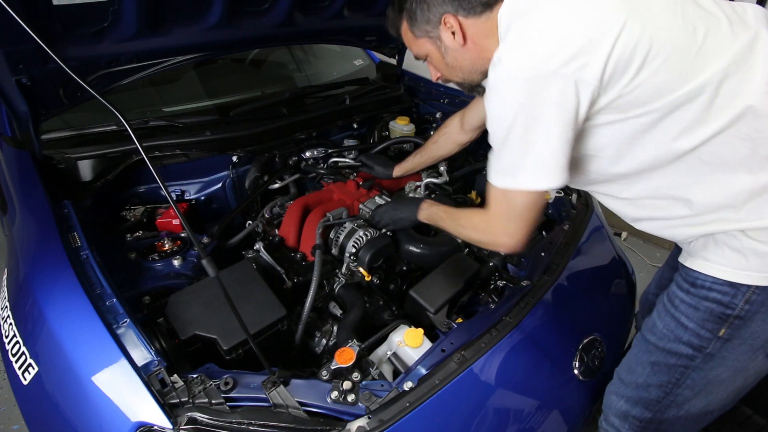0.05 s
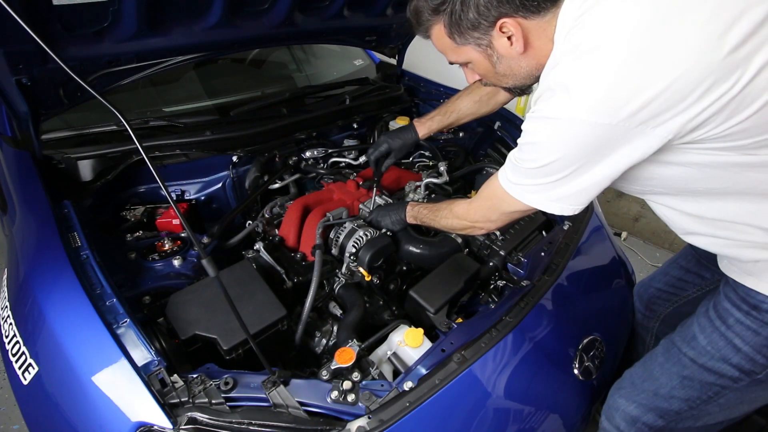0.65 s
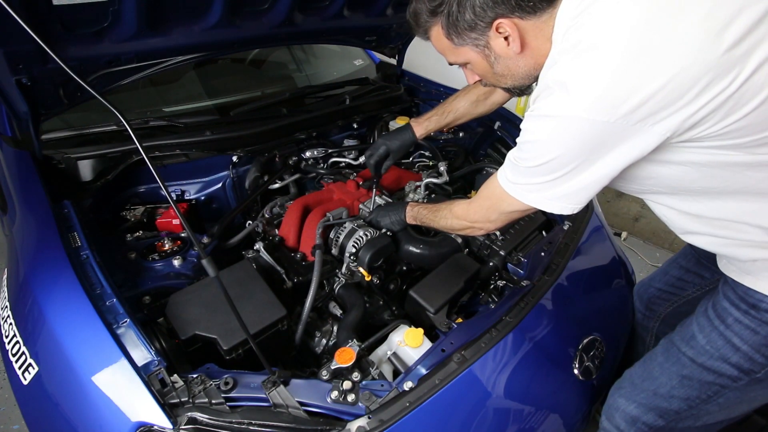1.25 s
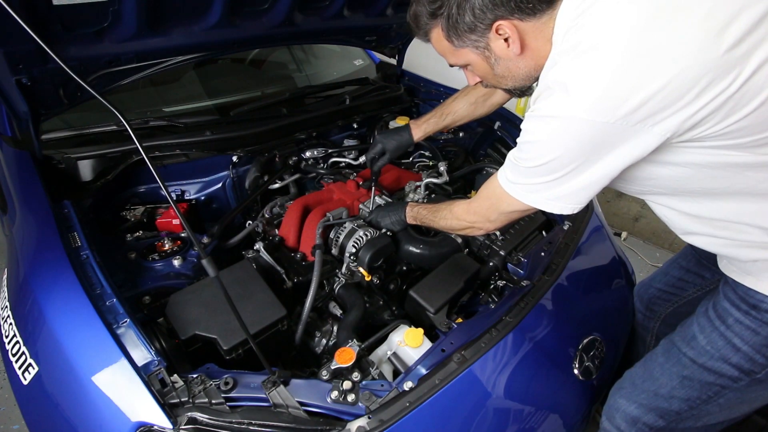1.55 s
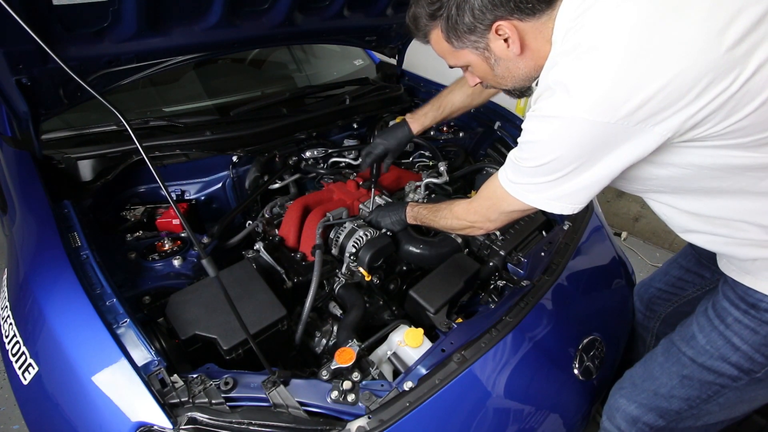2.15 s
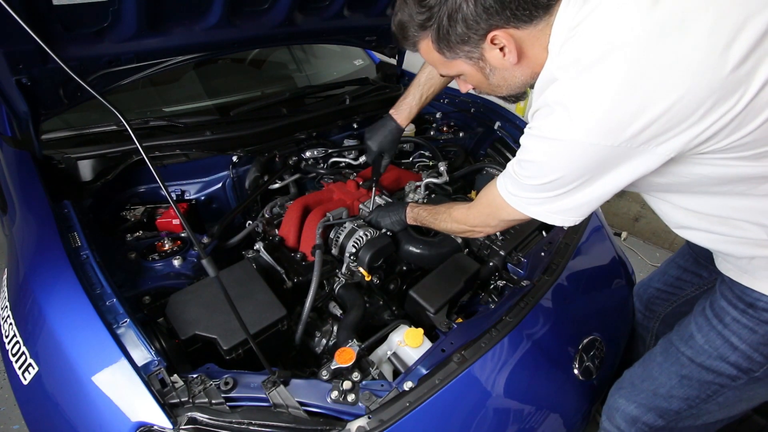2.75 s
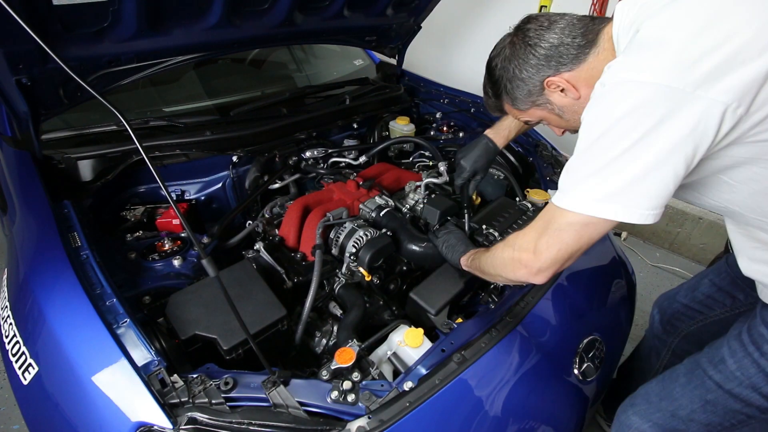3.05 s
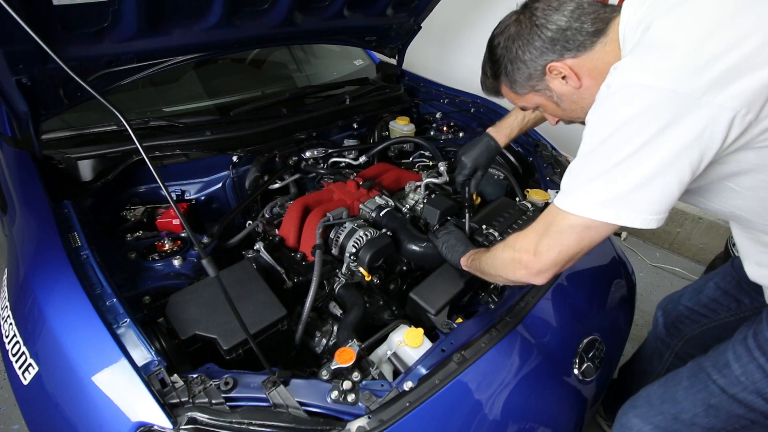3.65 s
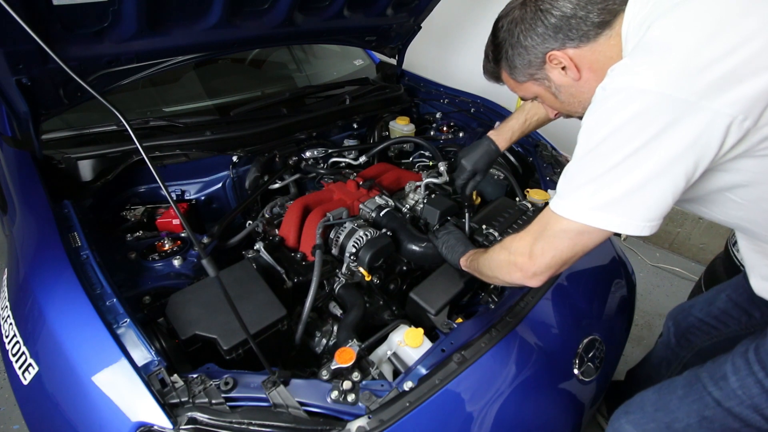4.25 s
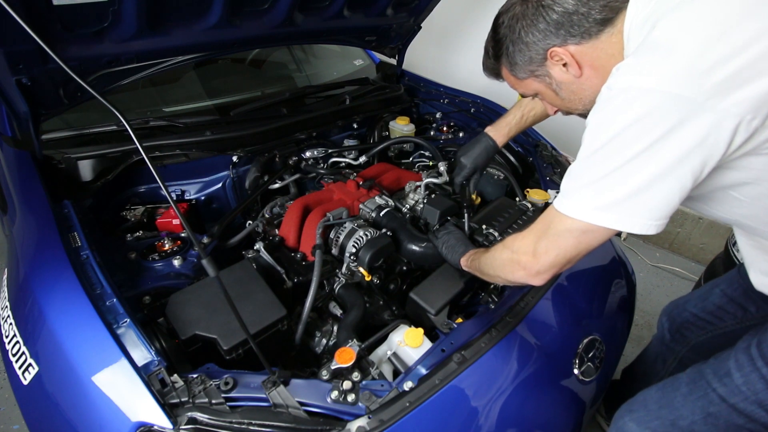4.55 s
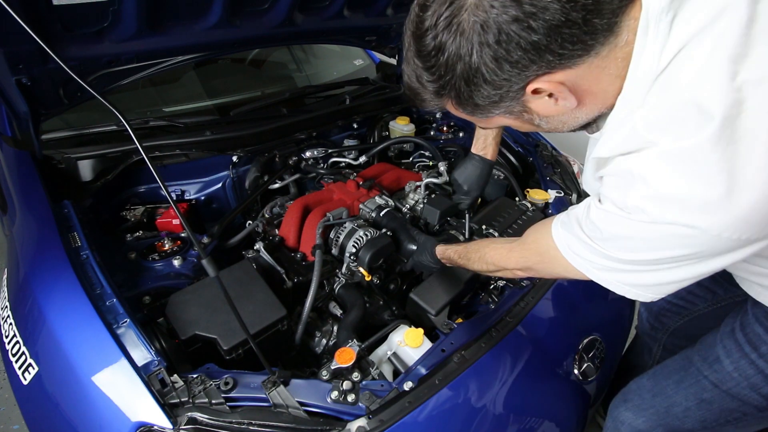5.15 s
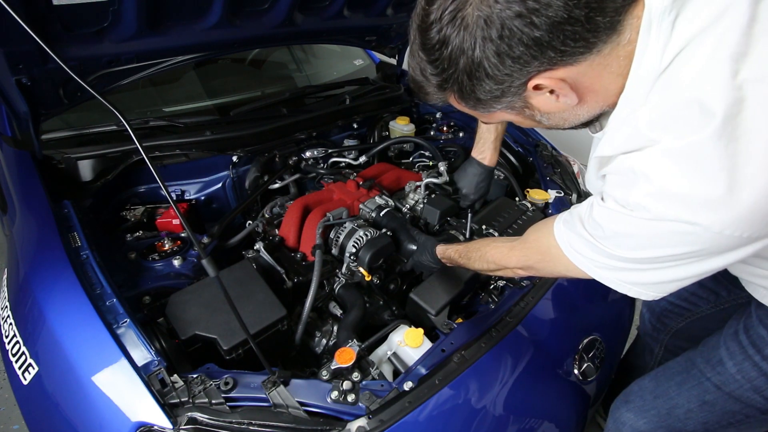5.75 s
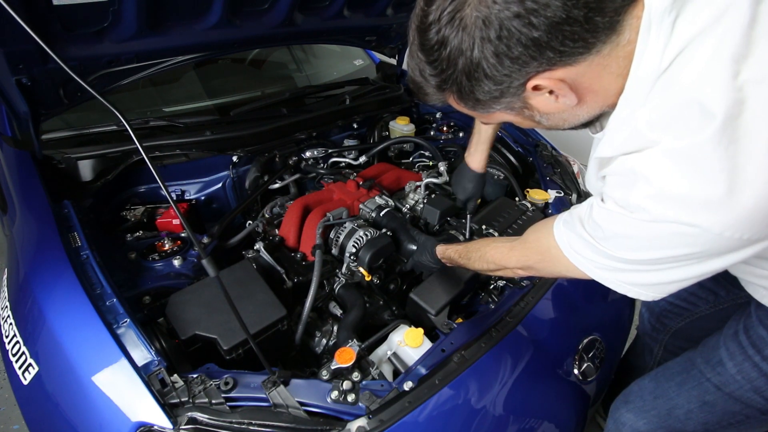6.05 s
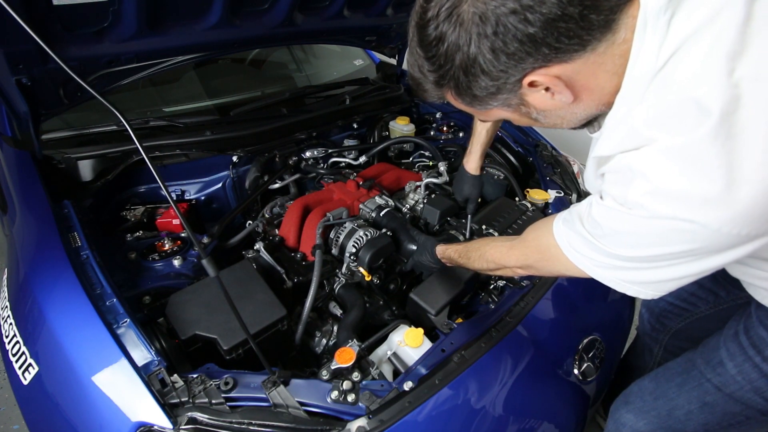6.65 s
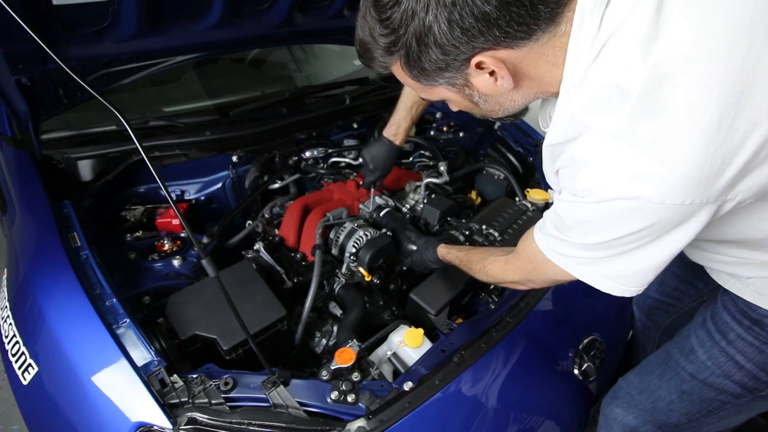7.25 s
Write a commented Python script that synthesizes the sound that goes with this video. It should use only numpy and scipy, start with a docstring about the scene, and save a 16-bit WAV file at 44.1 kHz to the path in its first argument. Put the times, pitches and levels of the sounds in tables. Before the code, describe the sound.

Rubber chafing, light metal clicks and glove rustle in a quiet garage, ending in five hollow plastic knocks, with soft electrical ticking throughout.

```python
"""First come a soft, steady ticking and a faint rustle of gloves in a quiet garage. The ticking is a
wireless beacon leaking into the microphone's amplifier. Hands work a rubber hose into an engine bay:
it chafes as it catches and slips, and its metal clamps click against their fittings. Near the end,
plastic parts snap into place with loud knocks that ring in a hollow duct and around the room."""
import sys
import numpy as np
from scipy import signal
from scipy.fft import rfft, irfft, next_fast_len
from scipy.io import wavfile
from scipy.ndimage import map_coordinates

SR = 44100
rng = np.random.default_rng(int(sys.argv[2]) if len(sys.argv) > 2 else 0)


def wav_record(signal):
    """Record a signal, one row per channel, as 16-bit PCM in the file named by sys.argv[1]."""
    frames = np.transpose(np.atleast_2d(signal))
    bounded = np.clip(frames, -1, 1)
    # unit amplitude maps onto the largest positive 16-bit level
    quanta = np.round(bounded * 32767).astype(np.int16)
    wavfile.write(sys.argv[1], SR, quanta)


N = 330750  # 7.5 seconds

# how long the garage's echo takes to fade by 60 dB: (frequency [Hz], fade time [s])
ECHO_FADE = [(100, 0.02), (450, 0.39), (1200, 0.73), (3500, 0.57), (6000, .5), (12000, 0.58)]
# how strong the echo starts, from bass to treble: (frequency [Hz], level [dB])
ECHO_COLOUR = [(100, 21), (450, 10.5), (1200, 3), (3500, 0), (6500, -1), (12000, -4.5)]
# the colour of each sound, meaning its mix of low and high: (frequency [Hz], level [dB])
ROOM_COLOUR = [(12, -42), (20, -2.5), (77, 0), (328, -15), (472, -2), (624, -12), (949, -10), (1120, -19.5),
               (1860, -21), (3250, -18), (4060, -19.5), (14300, -21.5), (16000, -25.5)]
HISS_COLOUR = [(12, -32), (20, -6.5), (485, -17), (698, -17), (849, -17), (976, -27), (3630, -26),
               (4420, -17.5), (13900, -15), (16000, -16.5)]
SHOE_COLOUR = [(80, -4), (150, -10), (240, 3.5), (400, -5), (650, -5), (880, -4.5), (1150, -11),
               (1600, -20), (4000, -50)]
GLOVE_COLOUR = [(710, -28), (1200, 2), (1630, -7), (2180, 1.5), (2350, -5), (2920, 0), (5180, -4.5),
                (6580, -9), (15000, -21), (16000, -35)]
SLEEVE_COLOUR = [(150, -22), (250, -3), (468, -1.5), (701, -2), (1150, -3), (1730, -11), (2500, -9.5),
                 (3250, -35), (5500, -120)]
FENDER_COLOUR = [(30, -29), (60, -6), (85, -3.5), (108, -3), (160, -4.5), (220, -6.5), (400, -15),
                 (800, -60)]
HOSE_COLOUR = [(120, -29), (230, -8), (380, -5), (700, -5.5), (1100, -3), (1620, -5.5), (2300, -6),
               (3200, -5.5), (4200, -7.5), (5300, -7), (6200, -10), (8400, -13), (10700, -12.5),
               (16000, -23)]
CLAMP_COLOUR = [(90, -43), (180, -10), (320, -13), (460, -3), (700, -4), (1050, -1), (1480, -4), (2300, -5),
                (3200, -2), (4100, -5.5), (4800, 0), (8400, -15), (10800, -11), (16000, -27)]
PLASTIC_COLOUR = [(40, -48), (80, -15), (160, -10.5), (250, -14.5), (340, -5.5), (430, 1), (680, -5),
                  (1050, -1.5), (1400, -5), (2100, -8.5), (3200, -8), (4400, -13.5), (5600, -10.5),
                  (10500, -26.5), (16000, -34)]
# the pitches that each part makes louder: (frequency [Hz], width [Hz], level [dB])
FITTING_PEAKS = [(474, 65, 1), (1120, 300, 1), (2890, 360, 4), (3550, 180, 4), (4640, 230, -11),
                 (5110, 650, 3), (10800, 990, -5)]
CLAMP_PEAKS = [(464, 130, -0.5), (2160, 50, -21), (2980, 390, 1.5), (3670, 130, 3), (4640, 140, -8),
               (4930, 220, -22), (5170, 260, 1), (7340, 290, 1), (9420, 200, 0), (11000, 250, 0)]
PLASTIC_PEAKS = [(293, 25, 0.5), (370, 42, 1.5), (499, 37, -0.5), (621, 82, 2.5), (759, 13, 2.5),
                 (819, 13, 4.5), (1030, 61, -7), (1084, 100, 0.5), (1110, 29, -11), (1227, 24, -5.5),
                 (2430, 130, -13.5), (3050, 300, -11), (3490, 140, -1.5)]
# the notes a struck duct or fender rings with: (frequency [Hz], level [dB], time to fade 60 dB [s])
DUCT_NOTES = [(390.3, 1, 0.29), (482, 3.5, 0.71), (500, -1.5, 1), (550, -4.5, 0.73), (610, -2, 0.89),
              (677, -6, 0.34), (775, -12, 0.25), (1070, -40, 0.3), (1240, 1, 0.26), (1307, -7, 1),
              (3660, -12, 0.32)]
FENDER_NOTES = [(118.4, -1.5, 0.3), (156, -5.5, 0.5), (177.6, -7.5, 0.48), (253, -12, 0.33), (286, 6, 0.43),
                (318, -2, 0.92), (345, -7.5, 0.19), (387, 5, 0.14)]
# tone on the engine (first row) and at the hollow air box (second): (low [dB], middle [dB], treble [dB])
HOSE_TONE = [(0.5, -1.5, -1.5), (10.5, 7, 0.5)]
CLAMP_TONE = [(-1, 0.5, 3.5), (10, 6.5, 6)]

# runs of beacon ticks: (start [s], end [s])
TICK_RUNS = [(.0604, .3), (.3445, 2.95), (3.0236, 5.), (5.1001, 7.5)]
# how hard the gloves work: (time [s], level [dB])
GLOVE_EFFORT = [(0.0, -58.5), (0.38, -53), (0.6, -51), (1.23, -49), (1.54, -54.5), (1.94, -49), (2.21, -48),
                (2.61, -53.5), (2.84, -56), (3.34, -50.5), (3.8, -53.5), (5.35, -58), (6.14, -64.5),
                (6.29, -59), (6.47, -75), (6.77, -61), (6.92, -52.5), (7.5, -60.5)]
# a sleeve swishes as an arm swings: (middle time [s], level [dB])
ARM_SWINGS = [(3.46, -49), (4.55, -52), (4.92, -45.5), (5.3, -46), (5.77, -36.5), (6.35, -42.5),
              (6.97, -42), (7.43, -50.5)]
# the body leans on the fender: (start [s], end [s], level [dB])
FENDER_LEANS = [(0, 0.203, -54), (3.05, 5.3, -54.5), (6.15, 6.35, -56), (6.786, 7., -54)]
# hard blows reach the fender's sheet metal: (time [s], level [dB])
FENDER_THUMPS = [(2.977, -45), (4.745, -31), (5.097, -28), (6.78, -29)]
# the twisted hose slips: (middle time [s], level [dB], treble [dB], half length [s])
HOSE_SLIPS = [(.11, -51, 14.5, 0.0078), (.412, -45.5, -3, .007), (.484, -39, 1, 0.0031),
              (.55, -42, -6, 0.0082), (.651, -37, 1, .009), (.698, -30, 3, 0.0043), (.847, -33.5, 3, 0.011),
              (.907, -35.5, 3.5, 0.0052), (1.063, -39, 0, 0.0055), (1.114, -34, 2, .008),
              (1.18, -41, -4, .005), (1.27, -36, 4, .005), (1.339, -35, -1.5, 0.0069),
              (1.467, -40.5, -4, 0.0046), (1.481, -36, 7, 0.0029), (1.542, -32, 4.5, 0.0079),
              (1.611, -40.5, 2, 0.0045), (1.731, -37.5, -0.5, .008), (1.779, -34.5, 3.5, 0.0046),
              (2.094, -37.5, -4, 0.0095), (2.205, -31.5, 0.5, 0.0072), (2.395, -42, -13, 0.0053),
              (2.53, -40.5, -4, .009), (2.863, -51.5, 1, 0.018), (2.996, -39, -2, .006),
              (3.169, -41, 6, 0.0081), (3.353, -43.5, 10, 0.0054), (3.484, -47, 5, .02),
              (3.553, -45.5, 6.5, 0.0062), (3.791, -46, 2, .01), (3.891, -39.5, -9, 0.0038),
              (4.09, -43.5, -2.5, .006), (4.191, -37, -4, 0.0093), (4.413, -36, -1.5, 0.0055),
              (4.498, -38.5, 1, 0.0053), (4.785, -34, 3.5, 0.0029), (5.116, -38, 6, .003),
              (5.184, -42, 4, .008), (5.608, -38, -7, 0.0061), (6.295, -35.5, -15, 0.01),
              (6.925, -36.5, -7, 0.0074), (7.264, -36.5, -2, 0.0088), (7.345, -35.5, -9, 0.016)]
# a clamp clicks: (time [s], level [dB], treble [dB], ring pitch [Hz])
CLAMP_CLICKS = [(.425, -36, 4.5, 3140), (0.491, -31.5, 4.5, 2900), (.897, -33.5, 0.5, 2880),
                (1.0186, -36, -13, 3080), (1.2273, -29, -8.5, 3280), (1.3231, -33.5, 0.5, 3800),
                (1.487, -31, 3, 4900), (1.68, -33.5, -14, 3230), (1.7918, -29.5, -9, 3500),
                (1.9271, -19, 1.5, 4880), (1.954, -31, -0.5, 2100), (2.0291, -27.5, -3, 2130),
                (2.3109, -31, -7, 3680), (2.976, -28.5, -5.5, 5600), (3.008, -35, -4.5, 3630),
                (3.0861, -39.5, -8, 5850), (3.247, -43, 0.5, 4800), (3.8767, -40, -1, 5050),
                (4.068, -40, -12, 2750), (4.171, -41, -5, 4670), (4.396, -39, -3.5, 5200),
                (4.7438, -38.5, -34, 2340), (4.766, -38, -1, 4800), (4.773, -38, 2, 5190),
                (4.8147, -41.5, -1, 4800), (4.883, -33.5, -10.5, 2980), (5.2902, -37, -12, 2700)]
# a plastic part snaps into place: (time [s], level [dB], depth [dB], treble [dB], ring pitch [Hz],
# duct level [dB], bounce delay [s], settling delay [s]); depth lifts the low and middle pitches
PLASTIC_KNOCKS = [(5.096, -18, 1, -7, 2460, -28, 0.024, 0.16),
                  (5.622, -25, -2.5, 2.5, 3500, -37, 0.0056, 0.16),
                  (6.1304, -21.5, 0, 5.5, 3220, -35, .03, .19), (6.7789, -18.5, 1, 3, 3380, -26, .03, .165),
                  (7.1896, -22.5, -4, -1, 3500, -21, 0.026, 0.19)]
# added to a knock for its snap, its bounce and its settling: (level [dB], depth [dB], treble [dB])
KNOCK_STAGES = [(0, 0, -2.5), (-9, -2.5, -7), (-12.5, 1, -1)]

MOVE_S = (2.18, 2.61)  # the hands leave the engine, then arrive at the air box


def amp(db):
    """Turn decibels into a number to multiply by."""
    return 10 ** (np.asarray(db) / 20)


def unit(x):
    """Scale a signal so its average strength (rms) is 1."""
    return x / np.sqrt(np.mean(x ** 2) + 1e-20)


def along(points, hz):
    """Read between the rows of a (frequency, value) table, spacing pitches by octaves."""
    freqs, values = np.transpose(points)
    return np.interp(np.log(hz + 1), np.log(freqs + 1), values)


def wobble(rate):
    """A smooth curve through `rate` random values a second."""
    return map_coordinates(rng.standard_normal(int(N * rate / SR) + 4), [np.arange(N) * rate / SR])


def filtered(x, gain):
    """Turn each frequency up or down by gain(hz)."""
    size = next_fast_len(N + SR // 2)
    return irfft(rfft(x, size) * gain(np.fft.rfftfreq(size, 1 / SR)), size)[..., :N]


def noise(colour):
    """Steady noise of strength 1 in the given colour."""
    return unit(filtered(rng.standard_normal(N), lambda hz: amp(along(colour, hz))))


def add(track, s, sound):
    """Mix a sound into the track, starting at s seconds."""
    start = max(round(s * SR), 0)
    track[start:start + len(sound)] += sound[:max(N - start, 0)]


def garage_echo():
    """The walls return a wash of sound whose lows and highs fade at their own speeds."""
    hz, t, spectrum = signal.stft(rng.standard_normal(SR), SR, nperseg=256)
    fade_db = along(ECHO_COLOUR, hz)[:, None] - 60 * t / along(ECHO_FADE, hz)[:, None]
    echo = signal.istft(spectrum * amp(fade_db), SR, nperseg=256)[1]
    echo *= 1 - np.exp(-np.arange(len(echo)) / SR / 0.0023)  # quick fade-in
    return echo / np.linalg.norm(echo)


def beacon_ticks():
    """Each radio burst nudges the amplifier's voltage; a capacitor lets that step sag, leaving a tick."""
    period_s, burst_s, sag_hz = .1024, .0017, 140
    t, bursts = np.arange(N) / SR, np.zeros(N)
    for start, end in TICK_RUNS:
        bursts += (t >= start) & (t < end) & ((t - start) % period_s < burst_s)
    return -amp(-34) * signal.lfilter(*signal.butter(1, sag_hz, "high", fs=SR), bursts)


def shoe_scuff():
    """A shoe slides briefly on the floor and comes to rest."""
    times_s, levels_db = (.09, .11, .14, .23, .3, .45), (-90, -44, -43.5, -50.5, -53.5, -88)
    slide_db = np.interp(np.arange(N) / SR, times_s, levels_db)
    return amp(slide_db + 0.88 * wobble(134)) * noise(SHOE_COLOUR)


def body_rustle():
    """Gloves and sleeves brush unevenly, more as an arm swings; a leaning body rumbles on the fender."""
    swing_half_s, fade_db_per_s = 0.086, 130
    t = np.arange(N) / SR
    swish = sum(amp(db) * np.exp(-((t - s) / swing_half_s) ** 2 / 2) for s, db in ARM_SWINGS)
    lean = sum(amp(db - fade_db_per_s * abs(t - np.clip(t, start, end)))
               for start, end, db in FENDER_LEANS)
    effort = amp(np.interp(t, *np.transpose(GLOVE_EFFORT)))
    grip_db = 4.6 * wobble(28)
    glove_level = np.hypot(effort, amp(-10.5) * swish)  # hypot adds two levels by their power
    sleeve_level = np.hypot(amp(-53.5), swish)
    fender_level = np.hypot(amp(-64), lean)
    glove = glove_level * amp(grip_db - 5.5 + 2.4 * wobble(300)) * noise(GLOVE_COLOUR)
    sleeve = sleeve_level * amp(grip_db - 7 + 1.6 * wobble(90)) * noise(SLEEVE_COLOUR)
    fender = fender_level * amp(3.2 * wobble(20) - 2) * noise(FENDER_COLOUR)
    return glove + sleeve + fender


def hollow_ring(strikes, notes, attack_s):
    """A hollow part rings on after each strike, with a new mix of its notes every time."""
    out, t = np.zeros(N), np.arange(SR) / SR
    for s, db in strikes:
        ring = np.zeros(SR)
        for hz, note_db, fade_s in notes:
            fade = amp(note_db + rng.normal(0, 2.8) - 60 * t / fade_s)
            ring += fade * np.sin(2 * np.pi * (hz * t + rng.random()))
        add(out, s, amp(db - 14) * ring * (1 - np.exp(-t / attack_s)))
    return out


def part_response(colour, peaks, touch, peak_db, ring_db, ring_width, size=8192):
    """How a part answers one tiny tap; each spot touched has its own tone and brief ring."""
    low_db, middle_db, treble_db, ring_hz = touch
    hz = np.fft.rfftfreq(size, 1 / SR)
    bump = lambda centre, width: 1 / (1 + (2 * (hz - centre) / width) ** 2)
    peak_power = sum(amp(db + peak_db) ** 2 * bump(centre, width) for centre, width, db in peaks)
    ring_power = amp(ring_db) ** 2 * bump(ring_hz, ring_width * ring_hz)
    gain = unit(amp(along(colour, hz)) * np.sqrt(1 + peak_power + ring_power))
    tone = [(620, low_db), (900, middle_db), (1600, middle_db),
            (2500, 0), (5400, 0.0039), (8000, treble_db)]
    gain *= amp(along(tone, hz))
    # make the part ring only after the tap, never before (called minimum phase)
    cepstrum = irfft(np.log(np.maximum(gain, 1e-5)))
    fold_forward = np.r_[1, np.full(size // 2 - 1, 2), 1, np.zeros(size // 2 - 1)]
    return irfft(np.exp(rfft(cepstrum * fold_forward)))


def contact(force, response, db, echo_db, echo_delay=0):
    """A force makes a part sound, and the garage answers echo_delay samples after it starts."""
    drive = np.pad(amp(echo_db) * garage_echo(), (echo_delay, 0))
    drive[:len(force)] += force / np.linalg.norm(force)
    return amp(db) * np.sqrt(SR / 100) * signal.fftconvolve(drive, response)  # level as if 10 ms long


def blow(scatter_db, contact_s, fade_s):
    """A quick push swells and lets go, then scatters among the engine's parts."""
    t = np.arange(SR // 10) / SR
    strike = t * np.exp(-t / contact_s)
    scatter = amp(-60 * t / fade_s) * (1 - np.exp(-t / contact_s))
    strength = np.hypot(unit(strike), amp(scatter_db) * unit(scatter))
    return strength * rng.choice([-1, 1], len(t))  # random signs make it scrape


def tone_at(s, tones):
    """The tone follows the hands from the engine to the air box."""
    return [np.interp(s, MOVE_S, pair) for pair in np.transpose(tones)]


def faint_slips(per_second=3.9):
    """List small hose slips at random moments, stronger when the gloves work harder."""
    when, softness, length = rng.random((round(per_second * N / SR), 3)).T
    times = when * N / SR
    levels = np.interp(times, *np.transpose(GLOVE_EFFORT)) - 2 - 5 * softness
    return [(s, db, 0, half_s) for s, db, half_s in zip(times, levels, .008 * (.5 + length))]


def hose_rubs(slips):
    """Each slip of the rubber is a burst of tiny catches that swells, fades and sings in the fitting."""
    out = np.zeros(N)
    for s, db, bright_db, half_s in slips:
        low_db, middle_db, treble_db = tone_at(s, HOSE_TONE)
        octaves = .035 * bright_db + .2 * rng.standard_normal()  # brighter slips tend to sing higher
        squeak_hz = np.interp(s, MOVE_S, (3800, 4620)) * 2 ** octaves
        touch = low_db, middle_db, treble_db + bright_db, squeak_hz
        response = part_response(HOSE_COLOUR, FITTING_PEAKS, touch,
                                 peak_db=4.5, ring_db=11.5, ring_width=0.089)
        offset = np.arange(-3, 3, 1 / (half_s * SR))  # half lengths from the slip's middle
        catches = rng.standard_normal(len(offset)) * amp(7.3 * rng.standard_normal(len(offset)))
        force = catches * np.exp(-offset ** 2 / 2)
        add(out, s - 3 * half_s, contact(force, response, db, echo_db=-8.5, echo_delay=len(force) // 2))
    return out


def clamp_clicks():
    """Clamps tap against their fittings, each with a brief metallic ring."""
    out = np.zeros(N)
    for s, db, bright_db, ring_hz in CLAMP_CLICKS:
        low_db, middle_db, treble_db = tone_at(s, CLAMP_TONE)
        touch = low_db, middle_db, treble_db + bright_db, ring_hz
        response = part_response(CLAMP_COLOUR, CLAMP_PEAKS, touch,
                                 peak_db=2.5, ring_db=10, ring_width=0.065)
        force = blow(scatter_db=1, contact_s=0.00057, fade_s=0.049)
        add(out, s, contact(force, response, db, echo_db=-11))
    return out


def plastic_knocks():
    """Stiff plastic parts snap into place, deep and loud, then bounce and settle more softly."""
    out = np.zeros(N)
    for s, db, depth_db, treble_db, ring_hz, _, bounce_s, settle_s in PLASTIC_KNOCKS:
        for delay, (stage_db, deeper_db, brighter_db) in zip((0, bounce_s, settle_s), KNOCK_STAGES):
            touch = depth_db + deeper_db, depth_db + deeper_db, treble_db + brighter_db, ring_hz
            response = part_response(PLASTIC_COLOUR, PLASTIC_PEAKS, touch,
                                     peak_db=5.5, ring_db=6, ring_width=0.19)
            force = blow(scatter_db=3, contact_s=0.00085, fade_s=0.074)
            add(out, s + delay, contact(force, response, db + stage_db, echo_db=-8))
    return out


def scene():
    """Left and right get the same sounds, with a faint hiss added to one and taken from the other."""
    handling = clamp_clicks() + plastic_knocks() + hose_rubs(HOSE_SLIPS) + body_rustle() + shoe_scuff()
    jolts = [(s, duct_db) for s, _, _, _, _, duct_db, _, _ in PLASTIC_KNOCKS]
    duct = hollow_ring(jolts, DUCT_NOTES, attack_s=0.0011)
    fender = hollow_ring(FENDER_THUMPS, FENDER_NOTES, attack_s=0.0012)
    room = amp(-56.5) * noise(ROOM_COLOUR)
    hiss = amp(-62) * noise(HISS_COLOUR)
    mix = room + beacon_ticks() + hose_rubs(faint_slips()) + duct + fender + handling
    return np.array([mix + hiss, mix - hiss])


def record(dry):
    """Cut away the very highest treble, from 16000 Hz up."""
    return filtered(dry, lambda hz: hz < 16000)


dry = scene()
out = record(dry)
wav_record(out)
```